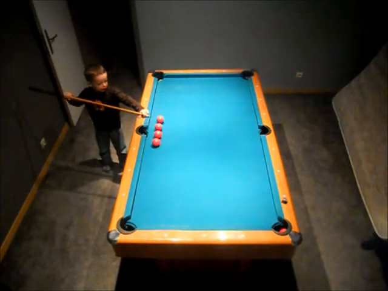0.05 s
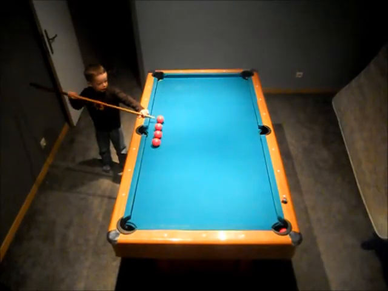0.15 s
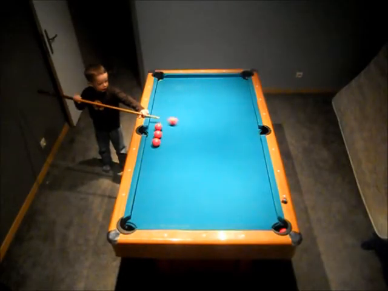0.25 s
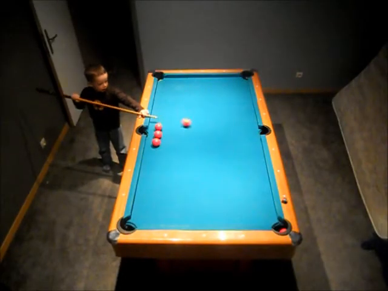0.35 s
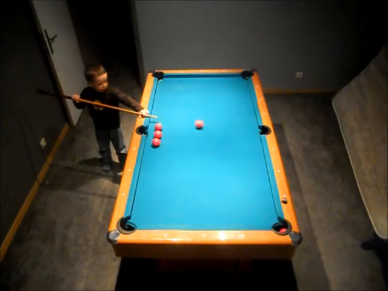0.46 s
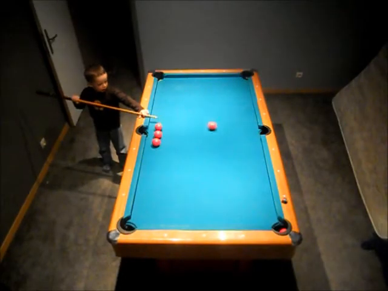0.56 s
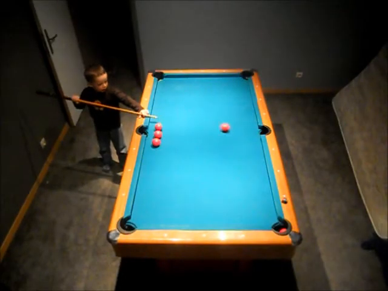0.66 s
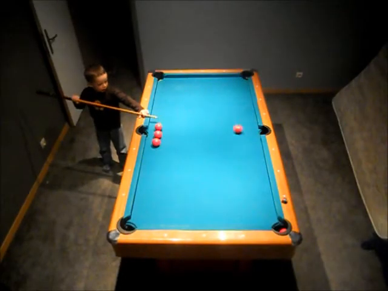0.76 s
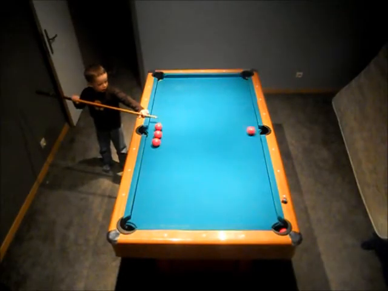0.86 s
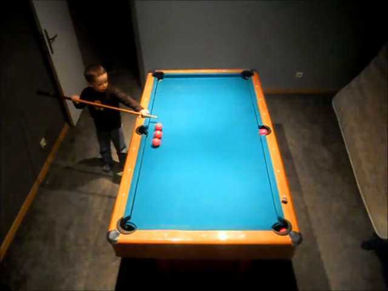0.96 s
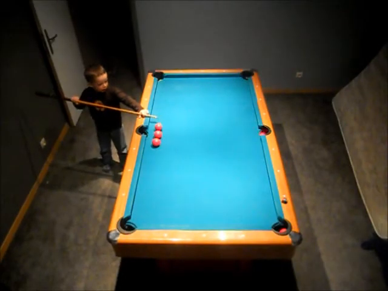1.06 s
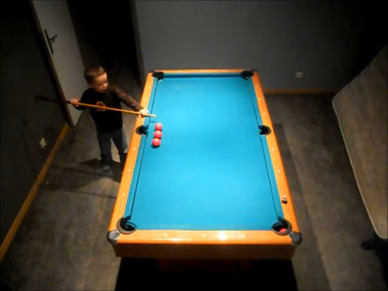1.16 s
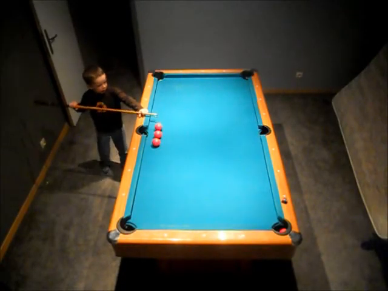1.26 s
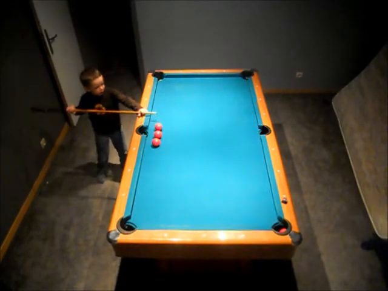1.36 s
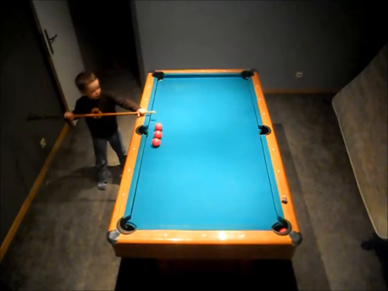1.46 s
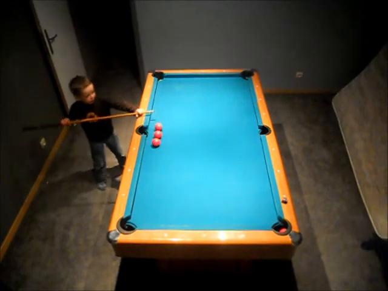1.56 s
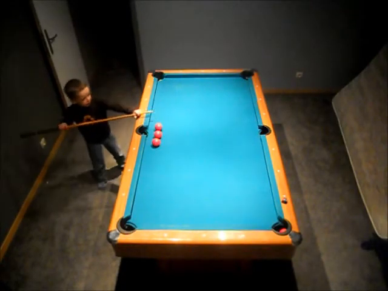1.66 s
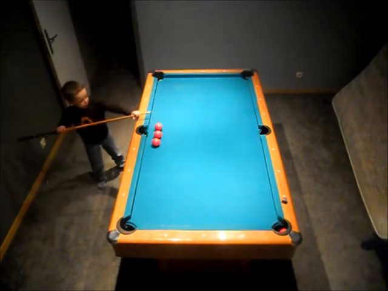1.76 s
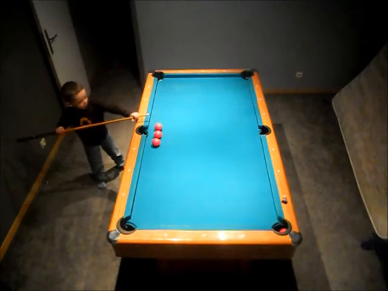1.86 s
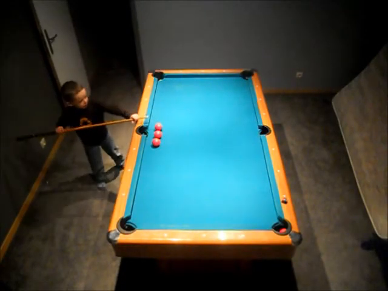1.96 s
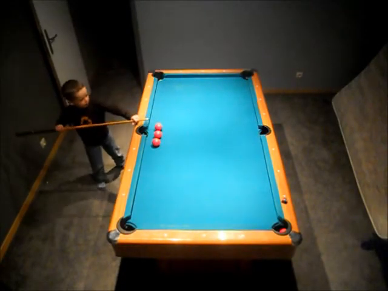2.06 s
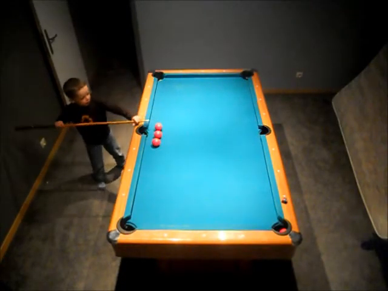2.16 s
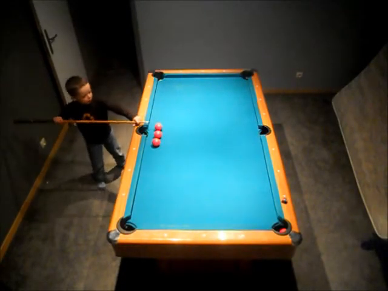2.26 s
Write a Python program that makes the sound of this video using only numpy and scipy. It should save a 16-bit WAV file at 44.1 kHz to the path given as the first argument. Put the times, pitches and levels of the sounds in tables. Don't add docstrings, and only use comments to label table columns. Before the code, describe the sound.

A pool cue strikes a ball with a loud dull knock that overloads a small camera microphone; the ball rolls softly over cloth, rattles in the pocket jaws and drops with a thud, in an echoing bare room.

```python
import sys
import numpy as np
from scipy import signal
from scipy.io import wavfile

SR = 44100
rng = np.random.default_rng(int(sys.argv[2]) if len(sys.argv) > 2 else 0)


def generate_wav(signal):
    frames = np.transpose(np.atleast_2d(signal))
    scaled = np.clip(frames, -1, 1) * 32767
    pcm = np.round(scaled).astype(np.int16)
    wavfile.write(sys.argv[1], SR, pcm)


def level_to_linear(level):
    exponent = np.asarray(level, float) / 20
    return 10 ** exponent


N = 101430

# frequency in Hz, level in dB per Hz.
HISS_COLOUR = [(28, 13), (60, -5), (90, 1.5), (250, 2), (620, 1.5), (3000, -4.5), (8000, -8.5),
               (10200, -9.5)]
# frequency in Hz, level in dB per Hz.
ROOM_COLOUR = [(50, -20), (200, -0.5), (500, 3), (1300, -15), (1800, -19.5), (2400, -18.5), (5000, -27.5),
               (10000, -32.5)]
# frequency in Hz, time to fall 60 dB in seconds.
ROOM_T60 = [(80, 0.91), (250, 0.6), (1000, 0.44), (2500, 0.33), (5000, 0.18), (10000, 0.16)]
# time in seconds, level in dB.
ROLL_LEVEL = [
    (0.202, -50),
    (.3, -36),
    (0.599, -29.5),
    (.8, -31.5),
    (.98, -31),
    (1.05, -50.5),
]
# frequency in Hz, level in dB per Hz.
ROLL_COLOUR = [(40, -25), (70, -14), (98, 6), (140, -3), (210, -2), (350, -10.5), (500, -34), (2000, -54)]
# frequency in Hz, level in dB, time to fall 60 dB in seconds.
SHUDDER = [(76, -19, .5), (110, -21, .4), (180, -20, .3)]
# frequency in Hz, level in dB,
# time to fall 60 dB in seconds.
FRAME_AND_FLOOR = [(70.4, -8.5, 0.35), (14.38, -26.5, 2), (11.24, -23, 3.84), (18.8, -30, 1.2),
                   (30.2, -26, 0.55), (116, -21, 0.56), (23.85, -24, 1.8),
                   (64.47, -20.5, 2.23), (70.66, -20.5, 1.25)]
# frequency in Hz, level in dB, time to fall 60 dB in seconds.
SETTLE = [(213, -33, 0.22), (256, -33, 0.27), (952, -28, 0.14)]
SETTLE_AGAIN_S = [0.032, .075, .10]
# time in seconds, hard tick in dB, top of the tick in Hz, wooden knock in dB.
RATTLE = [(0.9872, -4.5, 5000, -11.5), (0.9999, -12, 3000, -3), (1.0082, -31, 3000, -14),
          (1.0117, -34, 3000, -30), (1.026, -7, 10000, -2), (1.034, -16, 4000, 2.5),
          (1.039, -28, 4000, 5.5), (1.047, -12, 3000, -5.5), (1.0595, -7.5, 12000, -12),
          (1.087, -31, 7000, -17), (1.112, -38, 3000, -16.5), (1.127, -15, 8640, -10.5),
          (1.138, -19.5, 8000, -24), (1.146, -26, 5000, -15.5), (1.21, -22, 1500, -25.5),
          (1.28, -22.5, 1300, -32), (1.30, -27, 1300, -25), (1.32, -30, 1300, -25.5)]
# frequency in Hz, level in dB, time to fall 60 dB in seconds.
POCKET_MODES = [(150, -24, 0.26), (213.6, -7.5, 0.76), (264, -6, 0.52), (312.4, 3, 0.42), (357, -8, 0.53),
                (396.4, 1.5, 0.16), (489.7, -1, 0.55), (585.4, 2, 0.27), (742, -7, .3), (739, -5.5, 0.29),
                (453, 5, 0.046)]
# frequency in Hz, level in dB, time to fall 60 dB in seconds.
LIP_MODES = [(1500, -11, 0.034), (2470, -11.5, 0.024), (3400, -11, 0.012), (5020, -21, 0.012)]
# frequency in Hz, level in dB, time to fall 60 dB in seconds.
TIP_KNOCK = [(146, -7.5, 0.035), (532, 3, 0.015), (926, 2, 0.11), (1500, -4.5, 0.046)]
# frequency in Hz, level in dB.
SHAFT_MODES = [(2790, -6), (3295, -13), (3730, -1), (4680, -7), (6200, -22)]
# frequency in Hz, level in dB, time to fall 60 dB in seconds.
TABLE_MODES = [(89.5, -15.5, 1.0), (152.4, -18, 0.96), (176, -11, 0.29), (214.6, -9, 0.85),
               (250.3, 1.5, 0.46), (261.7, -6.5, 0.69), (309, -5, 0.51), (372, -8.5, 0.56), (385, 3, 0.43),
               (459, -4, 0.38), (541, 1.5, 0.3), (576, -14, 0.66), (770, -12, .5), (870, -12.5, 0.43)]
# frequency in Hz, level in dB, time to fall 60 dB in seconds.
RAIL_MODES = [(942, -13.5, 0.39), (1010, -17, 0.52), (1156, -8.5, 0.32), (1300, -31, 0.18),
              (1395, -25, 0.46)]

HISS_DB, WHINE_HZ, WHINE_DB = -38.5, 7852, -60
SHUDDER_S, THUD_S, SETTLE_S, THUD_CONTACT_S = 0.99, 1.128, 1.44, 0.005
CONTACT_S, BASS_CUT_HZ, STRIKE_SPREAD_DB = 0.00027, 87, 3
BOUNCE_S, BOUNCE_DB = 0.0062, -3
RATTLE_TAIL_DB, RATTLE_TICK_TAIL_DB = 1.5, 14.5
CUE_S, TABLE_DB, CUE_TICK_DB, CUE_TAIL_DB = 0.2072, 2.5, -7.5, 18.5
DULL_HZ, BRIGHT_DB = 1490, -1.5
SHAFT_LAG_S, SHAFT_SWELL_S, SHAFT_DB = 0.0018, 0.0029, -5
SLATE_HZ, SLATE_DB, SLATE_T60_S = 2246, -19.5, 0.45
HOP_S, HOP_DB = 0.268, -9.5
TWIN_HZ, TWIN_DB, TICK_S = 9, -10.5, 0.0008
DUCK_DB, DUCK_S, HOLD_TO_S, CREEP_S = -15.5, 0.0067, 0.97, 0.64
CUTOFF_HZ, OVERLOAD = 11295, 1.0


def at_hz(points, hz):
    table = np.array(points)
    return np.interp(np.log(hz), np.log(table[:, 0]), table[:, 1])


def rms_one(x):
    return x / np.sqrt(np.mean(x ** 2) + 1e-20)


def clicks(s, db):
    out = np.full(N, 1e-18)
    out[(np.atleast_1d(s) * SR).astype(int)] = level_to_linear(db)
    return out


def ring(x, hz, t60):
    r = level_to_linear(-60 / (t60 * SR))
    w = 2 * np.pi * hz / SR
    return signal.lfilter([0, np.sin(w)], [1, -2 * r * np.cos(w), r * r], x)


def twin(x, hz, t60):
    neighbour_hz = hz + TWIN_HZ * (1 + hz / 500)
    return ring(x, hz, t60) + level_to_linear(TWIN_DB) * ring(x, neighbour_hz, t60)


def soften(x, s):
    r = np.exp(-1 / (s * SR))
    return signal.lfilter([1 - r], [1, -r], x)


def band(x, low_hz, top_hz):
    edges = [low_hz, min(top_hz, 0.45 * SR)]
    return signal.sosfilt(signal.butter(2, edges, "band", fs=SR, output="sos"), x)


def noise_bands(colour, shape):
    white = rng.standard_normal((2, N + SR // 2))
    edges = 12.5 * 2 ** np.arange(0, 10.1, 1 / 3)
    out = np.zeros(N)
    for k, (low, high) in enumerate(zip(edges, edges[1:])):
        middle = np.sqrt(low * high)
        sos = signal.butter(2, [low, high], "band", fs=SR, output="sos")
        noise = signal.sosfilt(sos, white[k % 2])[-N:]
        out += level_to_linear(at_hz(colour, middle)) * shape(middle) * noise
    return out


def convolve(x, h):
    return signal.fftconvolve(x, h)[:N]


def tick(x, top_hz, seed):
    burst = 0.43 * seed * np.exp(-np.arange(len(seed)) / SR / TICK_S)
    return band(2 * x + convolve(x, burst), 1100, top_hz)


def microphone_noise():
    steady = np.sin(2 * np.pi * WHINE_HZ * np.arange(N) / SR)
    wavering = rms_one(ring(rng.standard_normal(N), WHINE_HZ, 0.17))
    whine = rms_one(steady + 0.5 * wavering)
    hiss = rms_one(noise_bands(HISS_COLOUR, lambda hz: 1))
    return level_to_linear(HISS_DB) * hiss + level_to_linear(WHINE_DB) * whine


def room_tail():
    t = np.arange(N) / SR
    dying = noise_bands(ROOM_COLOUR, lambda hz: level_to_linear(-60 * t / at_hz(ROOM_T60, hz)))
    return dying * (1 - np.exp(-t / 0.0034))


def rolling_ball():
    count = N // 1500 + 2
    lumps = np.interp(np.arange(N) / 1500, np.arange(count), rng.standard_normal(count))
    s, db = np.transpose(ROLL_LEVEL)
    level = np.interp(np.arange(N) / SR, s, db, left=-120) + 0.83 * lumps
    return level_to_linear(level) * rms_one(noise_bands(ROLL_COLOUR, lambda hz: 1))


def frame_and_floor():
    settle_times = SETTLE_S + np.array([0] + SETTLE_AGAIN_S)
    out = np.zeros(N)
    for at, modes in [(SHUDDER_S, SHUDDER), (THUD_S, FRAME_AND_FLOOR), (settle_times, SETTLE)]:
        for hz, db, t60 in modes:
            push = soften(clicks(at, 0), min(THUD_CONTACT_S, 0.27 / hz))
            out += level_to_linear(db) * ring(push, hz, t60)
    return out


def pocket(tail):
    s, tick_db, top_hz, knock_db = np.transpose(RATTLE)
    spread = rng.normal(0, STRIKE_SPREAD_DB, (len(s), 20))
    seeds = rng.standard_normal((len(s), 400))
    knocks, lip, ticks, spikes = np.zeros((4, N))
    for k, (hz, db, t60) in enumerate(POCKET_MODES):
        knocks += (-1) ** k * twin(clicks(s, knock_db + db - 15 + spread[:, k]), hz, t60)
    for k, (hz, db, t60) in enumerate(LIP_MODES):
        lip += (-1) ** k * ring(clicks(s, tick_db + db + spread[:, -1 - k]), hz, t60)
    for at, db, hz, seed in zip(s, tick_db, top_hz, seeds):
        touch_and_echo = clicks([at, at + BOUNCE_S], np.array([db, db + BOUNCE_DB]))
        ticks += tick(touch_and_echo, hz, seed)
        spikes += band(clicks(at, db), 1080, 0.8 * hz + 600)
    wood = band(soften(clicks(s, knock_db), CONTACT_S), BASS_CUT_HZ, 9000)
    wet = convolve(level_to_linear(RATTLE_TAIL_DB) * wood + level_to_linear(RATTLE_TICK_TAIL_DB) * spikes, tail)
    heavy = band(knocks, BASS_CUT_HZ, 9000) + frame_and_floor()
    return soften(soften(heavy, CONTACT_S), CONTACT_S) + ticks + lip + wet


def cue_shaft():
    t = np.maximum(np.arange(N) / SR - CUE_S - SHAFT_LAG_S, 0)
    swell = (t / SHAFT_SWELL_S) ** 2 * np.exp(-2 * t / SHAFT_SWELL_S) * np.exp(2)
    tones = sum(level_to_linear(db) * np.sin(2 * np.pi * hz * t) * (-1) ** k for k, (hz, db) in enumerate(SHAFT_MODES))
    return swell * tones


def table_body():
    out = np.zeros(N)
    for k, (hz, db, t60) in enumerate(TABLE_MODES + RAIL_MODES):
        push = soften(clicks(CUE_S + 0.0068 + 0.002 * (k % 4), 0), 0.0001)
        out += level_to_linear(db) * (-1) ** k * twin(push, hz, t60)
    for k, (hz, db, t60) in enumerate(TABLE_MODES[3:9]):
        push = soften(clicks(HOP_S + 0.00296 * k, 0), 0.001)
        out += level_to_linear(db + HOP_DB) * (-1) ** k * ring(push, hz, t60)
    return out


def cue_blow(tail):
    hit = clicks(CUE_S, 0)
    push = soften(clicks(CUE_S + 0.00046, 0), 0.0001)
    dull = signal.sosfilt(signal.butter(4, DULL_HZ, fs=SR, output="sos"), hit)
    bright = band(band(hit, 3000, 14000), 3300, 14000)
    room = convolve(dull + level_to_linear(BRIGHT_DB) * bright, tail)
    knock = sum(level_to_linear(db) * ring(push, hz, t60) for hz, db, t60 in TIP_KNOCK)
    low = band(level_to_linear(TABLE_DB) * table_body() + knock, 45, 12000)
    slate = twin(push, SLATE_HZ, SLATE_T60_S)
    tip_tick = band(tick(hit, 14000, rng.standard_normal(400)), 5300, 14000)
    return (low + level_to_linear(SHAFT_DB) * cue_shaft() + level_to_linear(SLATE_DB) * slate
            + level_to_linear(CUE_TICK_DB) * tip_tick + level_to_linear(CUE_TAIL_DB) * room)


def scene():
    tail = room_tail()
    return (microphone_noise() + rolling_ball() + pocket(tail) + cue_blow(tail))[None]


def roll_off(x):
    return signal.sosfilt(signal.butter(12, 11490, fs=SR, output="sos"), x)


def record(dry):
    t = np.arange(N) / SR
    fall = 1 - np.exp(-np.maximum(t - CUE_S, 0) / DUCK_S)
    recovery = np.exp(-np.maximum(t - HOLD_TO_S, 0) / CREEP_S)
    ducked = dry * level_to_linear(DUCK_DB * fall * recovery)
    top_cut = signal.cheby2(10, 60, CUTOFF_HZ + 700, fs=SR, output="sos")
    mix = np.clip(signal.sosfilt(top_cut, ducked), -OVERLOAD, OVERLOAD)
    return roll_off(mix)


dry = scene()
out = record(dry)
generate_wav(out)
```